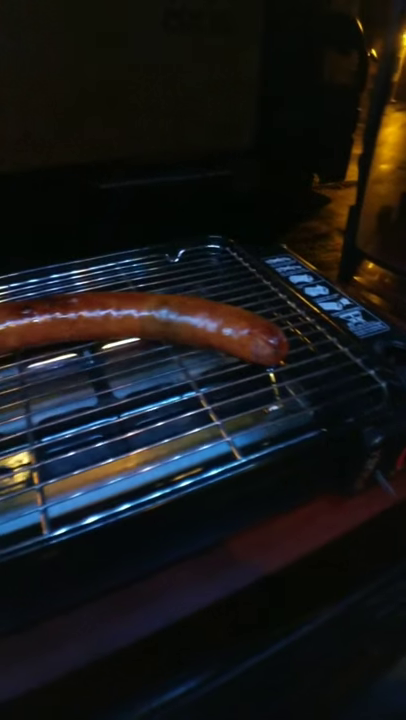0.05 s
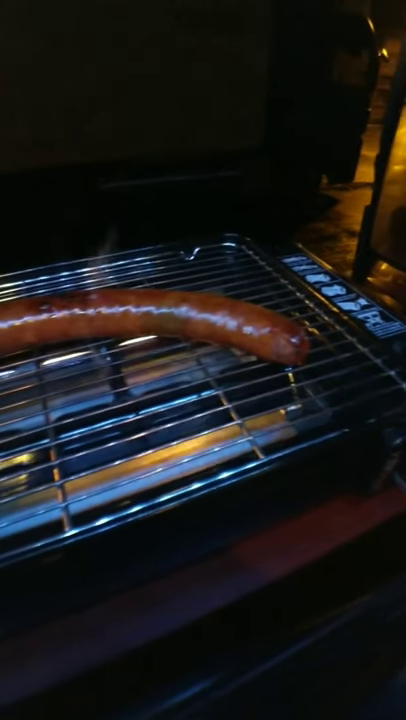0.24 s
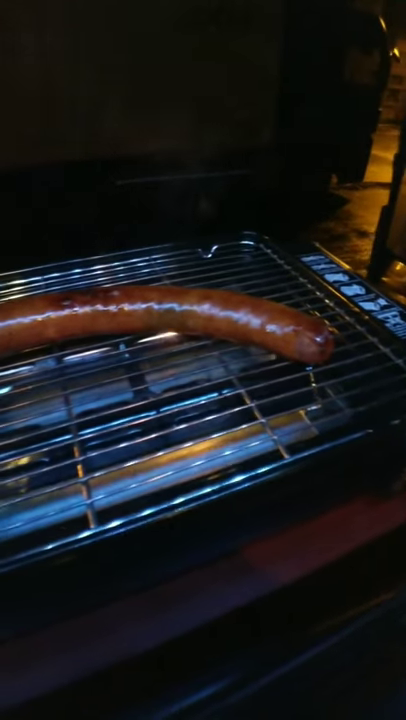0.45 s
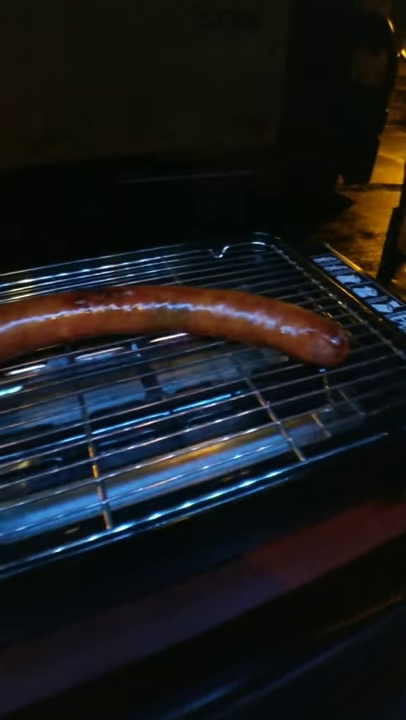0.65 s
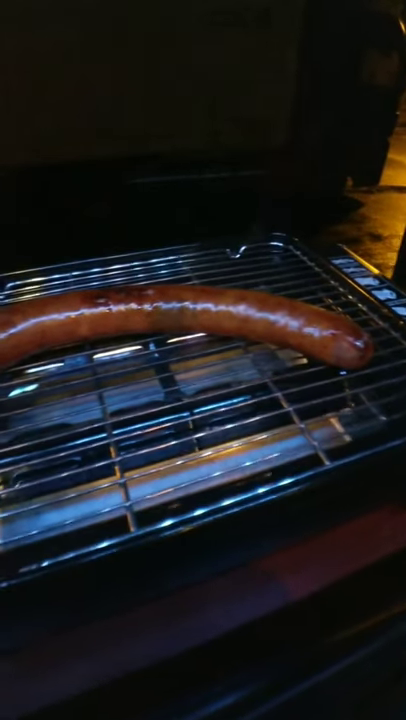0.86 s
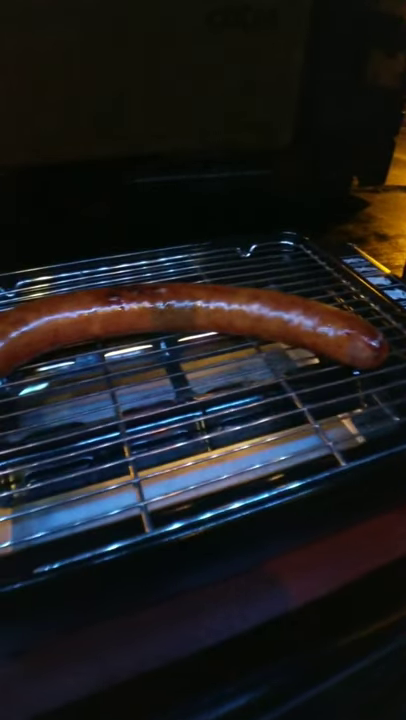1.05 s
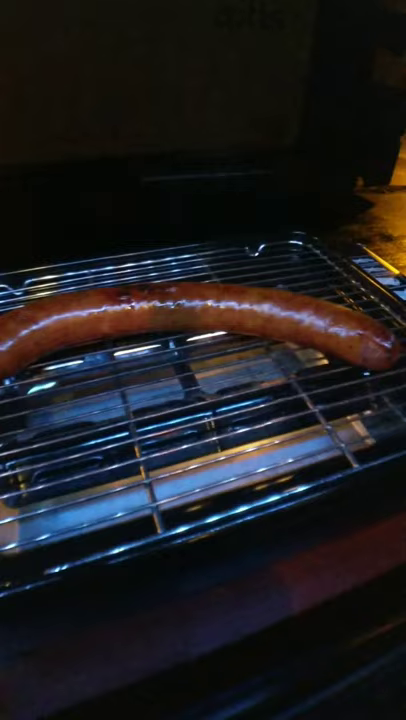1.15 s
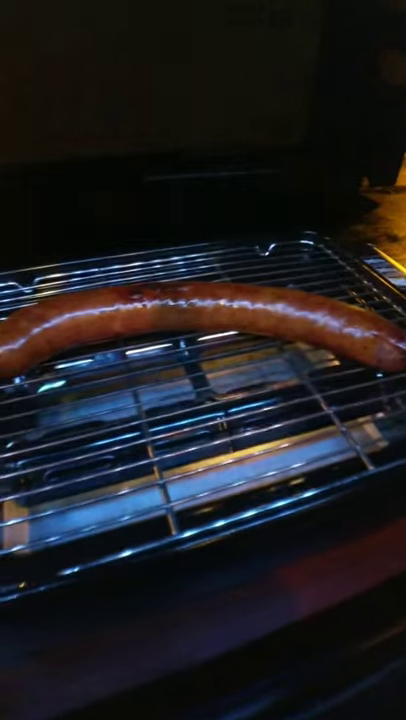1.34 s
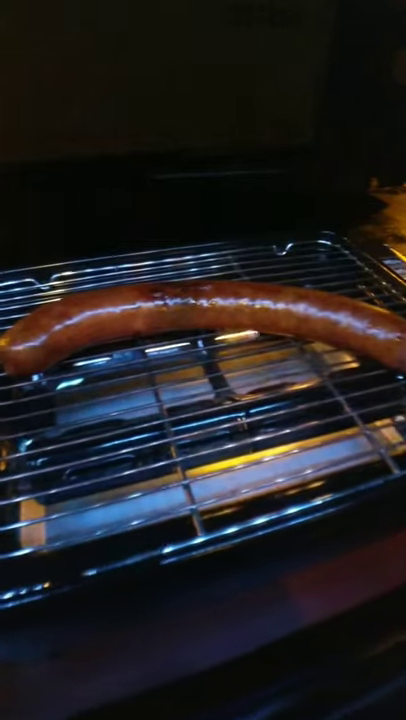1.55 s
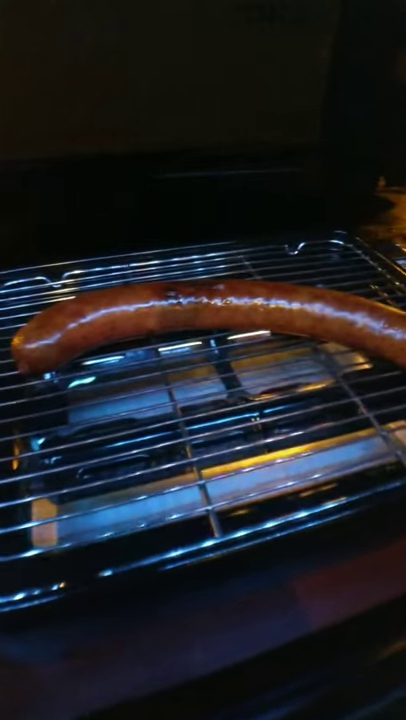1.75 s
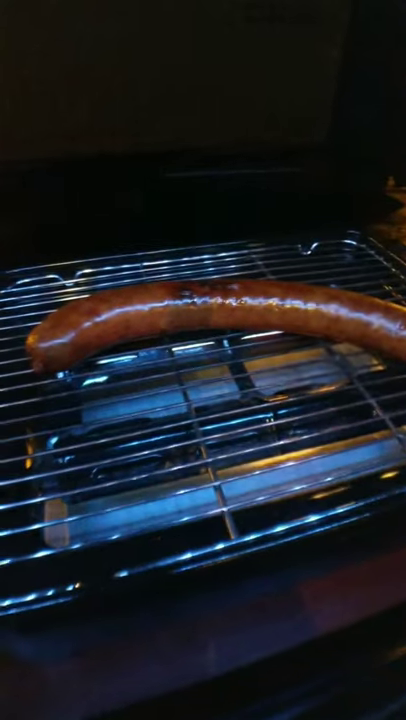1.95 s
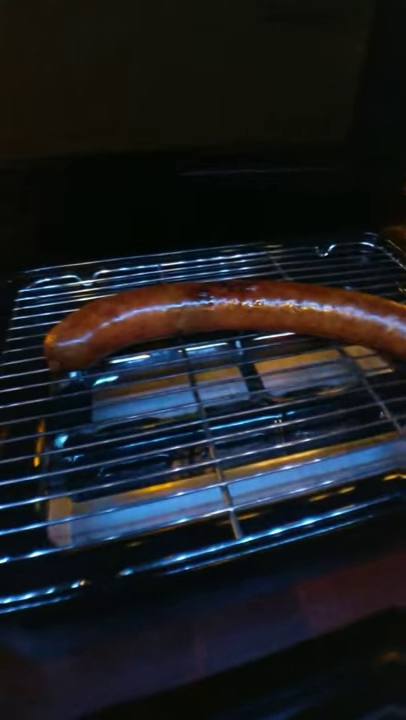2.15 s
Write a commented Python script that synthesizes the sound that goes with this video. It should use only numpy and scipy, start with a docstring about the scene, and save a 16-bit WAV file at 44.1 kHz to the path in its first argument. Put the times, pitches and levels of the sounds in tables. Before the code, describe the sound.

Fat spits and crackles on a tabletop grill inside a vehicle cab, near the microphone; a brief low flutter opens it, one ticking thump comes at left, snaps get stronger, then it cuts off.

```python
"""A sausage sizzles on a small steel grill in a vehicle cab: fat bubbles ring, snap and rattle briefly in the tray,
over noise shaped into a thin hiss. Filtered noise makes the low drone of the cab, which is louder for a moment
at the start, while a low flutter and a thin hiss of opposite sign in the two ears come and go. Then the sound is
almost mono. A low swing with a tick thumps in the left ear alone, later a narrow band of hiss grows,
and the sound stops abruptly."""
import sys
import numpy as np
from scipy import signal
from scipy.fft import rfft, irfft, next_fast_len
from scipy.io import wavfile
from scipy.ndimage import map_coordinates

SR = 44100
rng = np.random.default_rng(int(sys.argv[2]) if len(sys.argv) > 2 else 0)


def unload_wav(signal):
    """Save mono or channel-first audio to the path in sys.argv[1] as 16-bit WAV at rate SR, clipped to [-1, 1]."""
    wavfile.write(
        sys.argv[1],
        SR,
        np.round(np.clip(np.atleast_2d(signal).T, -1, 1) * 32767).astype(np.int16),
    )


def volts_from_db(level):
    """Convert decibel levels to linear amplitude ratios."""
    exponent = np.asarray(level, float) / 20
    return 10 ** exponent


N = 97196


def unit(x):
    """Scales a sound to rms 1."""
    return x / np.sqrt(np.mean(x ** 2) + 1e-20)


def curves(rows):
    """Draws straight lines between the rows: one value per sample for each column after the time."""
    seconds, *columns = np.transpose(rows)
    return [np.interp(np.arange(N) / SR, seconds, column) for column in columns]


def colour(points):
    """Gives the gain over frequency from (Hz, dB) points on a log axis."""
    f, db = np.transpose(points)
    return lambda hz: volts_from_db(np.interp(np.log(hz + 1), np.log(f + 1), db))


def resonance(centre_hz, width_hz):
    """Gives the gain of a narrow peak; the width is taken where the gain has halved."""
    return lambda hz: 1 / (1 + (2 * (hz - centre_hz) / width_hz) ** 2)


def filtered(x, response):
    """Multiplies the spectrum of x by a response of frequency."""
    m = next_fast_len(x.shape[-1] + 2048)
    spectrum = rfft(x, m) * response(np.fft.rfftfreq(m, 1 / SR))
    return irfft(spectrum, m)[..., :x.shape[-1]]


def wobble(rate):
    """Draws a smooth random curve through `rate` random knots a second."""
    knots = rng.standard_normal(int(N * rate / SR) + 4)
    return map_coordinates(knots, [np.arange(N) * rate / SR])


def noise(response):
    """Makes coloured noise of rms 1."""
    return unit(filtered(rng.standard_normal(N), response))


# The colour of the snaps. Each row: frequency in Hz, gain in dB.
SNAP_COLOUR = [(1200, -45), (2000, -15), (3500, -8), (4300, -8), (5200, -2), (6200, -4), (7200, -1),
               (8100, -5), (8800, 3), (11000, -2), (12500, -3), (14000, -9), (16500, -13)]
# A small bubble radiates no bass. Each row: frequency in Hz, gain in dB.
BUBBLE_BASS_LOSS = [(900, -24), (2400, 0)]


def bursts(s, db, hz, ms, snap_db):
    """Each bubble rings a few cycles with a snap, and the tray scatters it anew."""
    ring_cycles = 2.2  # the ring falls to 1/e in this many cycles
    rattle_db, rattle_fall_db = -16.5, 9  # start of the tray's answer, and its fall over the rattle length
    tail_db, tail_t60_s = -26.5, 0.052  # after-ring of the tray
    echo_ms, echo_gain = .567, .7  # every burst bounces once off the tray floor
    # under this peak a burst loses its first spike: dB per dB, down to a limit
    sharp_db, sharp_slope, softest_db = -24.5, 0.51, -4.5

    t = np.arange(768) / SR
    scatter = rng.standard_normal((len(s), len(t)))
    ring = np.sin(2 * np.pi * hz[:, None] * t) * np.exp(-t * hz[:, None] / ring_cycles)
    ring /= np.linalg.norm(ring, axis=1, keepdims=True)
    # the click is filtered away from the edge, then moved close to the start
    click = (np.arange(len(t)) == 24) * 1.
    snap = np.roll(filtered(click, colour(SNAP_COLOUR)), -20)
    bubble = ring + volts_from_db(snap_db)[:, None] * snap / np.linalg.norm(snap)

    rattle = volts_from_db(rattle_db - rattle_fall_db * (1000 * t / ms[:, None]) ** 2)
    tail = volts_from_db(tail_db - 60 * t / tail_t60_s)
    tray = scatter * (rattle + tail)
    spike = volts_from_db(np.clip(sharp_slope * (db - sharp_db), softest_db, 0))
    tray[:, 0] = spike
    tray[:, round(echo_ms * SR / 1000)] = echo_gain * spike

    pop = signal.fftconvolve(bubble, tray, axes=1)[:, :len(t)]
    pop *= (volts_from_db(db) / np.abs(pop).max(axis=1))[:, None]
    at = np.round(s * SR).astype(int)[:, None] + np.arange(len(t))
    placed = np.bincount(at.ravel(), pop.ravel(), N + len(t))[:N]
    return filtered(placed, colour(BUBBLE_BASS_LOSS))


# The loud bubbles of fat. Each row: start in seconds, peak in dB before the bass loss, pitch in Hz,
# rattle length in ms, broad snap over the ring in dB.
LOUD_BUBBLES = [(0.083, -33.5, 11700.0, 0.71, -1), (0.091, -44, 11500.0, 0.4, -6),
                (0.0942, -37, 8630, 2.9, 5), (0.0973, -39, 12400, 2.2, 3), (0.1124, -23, 12300, 1.4, 6),
                (0.1143, -30, 10200, 1.7, -1), (0.122, -38.5, 6500, 1.5, -7), (0.126, -33, 10100, 1.8, 1),
                (0.1328, -40, 11500, 1.2, -6), (0.138, -41, 10000, 1.6, -12), (0.16, -34, 6000, 2, 1),
                (0.162, -39, 12100, 1.2, 9), (0.167, -36, 10800, 3.3, 6), (0.181, -38, 11000, 1.2, -8),
                (0.1861, -35.5, 13700.0, 1.8, 16), (0.1922, -30.5, 9850, 2.5, 3),
                (0.2427, -48, 10000, 1.4, -10), (0.2587, -41, 10000, 0.75, -5),
                (0.2682, -39.5, 4730, 3.9, 0), (0.279, -32, 9600, 0.87, 13), (0.2897, -37, 11500.0, 1.0, 9),
                (0.2956, -30.5, 9400, 2.2, 6), (0.305, -36, 11000.0, 1.0, 2), (0.3076, -32, 9200, 1.4, 13),
                (0.3207, -39, 7100, 1.3, 1), (0.3346, -44, 10500.0, 1.5, 1), (0.3392, -42, 4900, 1.3, -4),
                (0.3477, -32.5, 11000, 0.75, -4), (0.3595, -33, 4800, 1.3, 1),
                (0.3647, -35, 10700, 1.2, -4), (0.4073, -53, 8900.0, 1.2, 5), (0.413, -25.5, 8800, 0.83, 4),
                (0.4205, -30.5, 10900, 0.51, -9), (0.4355, -36, 10400, 0.94, -10),
                (0.445, -35, 8900.0, 0.94, 9), (0.4527, -38.5, 9500, 1.5, -8), (0.459, -40, 12500, 1.1, -3),
                (0.486, -39, 9000, 1.5, 7), (0.494, -37, 8800, 4.6, -27), (0.518, -31, 8600, 0.81, 0),
                (0.5226, -29, 5000, 1.6, 0), (0.5364, -35, 8800.0, 2.2, 1), (0.5438, -26, 4820, 2.2, 5.5),
                (0.573, -41, 8600, 0.87, -6), (0.5802, -38, 10640, 1.6, -9), (0.597, -38, 10440, 1.3, -2),
                (0.601, -33, 12800.0, 1.1, -6), (0.605, -45, 9600, 1.5, -5), (0.611, -40, 4760, 1.3, -3),
                (0.6173, -36.5, 5170, 1.3, -5), (0.619, -32.5, 11000, 1.1, -9), (0.63, -37, 4960, 1, -2),
                (0.6387, -36.0, 5200, 1.2, -3), (0.6483, -37.5, 5100, 1.1, -10),
                (0.6676, -31.5, 11460, 1.1, -6), (0.673, -39, 10200, 1.7, -10), (0.683, -39, 5030, 1.1, -7),
                (0.6924, -39.5, 5000, 1, -10), (0.695, -40, 10500, 1.2, -2), (0.703, -51, 13000, 1.2, -3),
                (0.714, -37, 7500, 2.7, 1), (0.743, -35, 11200, 1.6, -6), (0.7532, -31.5, 4900, 1.2, 6),
                (0.7848, -33.5, 4920, 1.1, -1.5), (0.791, -38.5, 5160, 2.6, 3.5),
                (0.8107, -38.5, 10000.0, 1.2, 1), (0.8211, -27.5, 5130, 1.8, 2),
                (0.8347, -28, 5130, 1.8, -2), (0.8388, -27, 9700, 0.95, 0.5),
                (0.847, -34.5, 5060, 0.68, -13), (0.86, -36, 12000, 0.8, 10), (0.8666, -28, 10900, 1.2, 8),
                (0.8814, -28.5, 10830, 2.1, -1.5), (0.9044, -32.5, 11000, 1.2, 14),
                (0.9452, -34.5, 4970, 1.1, -2), (0.9501, -32.5, 9540, 4.1, 3), (0.97, -38, 5200, 0.92, 6),
                (0.9923, -43, 7250, 1, -10), (0.9986, -34.5, 5300, 0.65, 2), (1.0032, -38, 4800, 1.5, -2),
                (1.0115, -35, 7900, 1.2, -6), (1.0275, -40, 12500, 1.1, 6), (1.043, -42, 13000, 1, -5),
                (1.05, -39.5, 7000.0, 0.86, -3), (1.053, -34.5, 12500, 1.2, 0),
                (1.0884, -32.5, 7400, 1.5, 2), (1.094, -30.5, 8900, .8, 3), (1.095, -28.5, 5330, 4.2, 6),
                (1.1262, -34, 10200, 1.8, 1), (1.1579, -24, 8800, 1.8, 9), (1.1657, -31.5, 8870, 1.4, 5.5),
                (1.1675, -25, 12000, 1.5, 5), (1.1693, -22, 10160, 3.5, 6),
                (1.1854, -30, 12600.0, 1.1, -7.5), (1.1918, -37, 8800, 1.5, -21),
                (1.215, -24.5, 11900, 1.8, 23), (1.2254, -38.5, 6960, 1.5, -3),
                (1.2352, -35, 15100, 1.1, -11), (1.2594, -28.5, 6900, 1.6, 3), (1.26, -29, 14800, 1.2, -3),
                (1.2627, -34.5, 6500, 1.3, -11), (1.267, -41, 7300, 2.9, -10.5),
                (1.2851, -33.5, 7200, 1.4, -1), (1.3213, -36.5, 5200, 1.8, 1.5), (1.3537, -35, 7440, 1, 0),
                (1.3713, -33, 8170, 1.7, -26.5), (1.388, -29.5, 7170, 1.1, 1),
                (1.4306, -29.5, 9000, 0.85, 1.5), (1.452, -43.5, 8700, 1.5, -2),
                (1.463, -32.5, 13360, 2.2, -1), (1.475, -30.5, 9300, 2.4, -14),
                (1.4935, -41, 12000, 0.94, 7), (1.5017, -37, 7400, 1.9, -8), (1.507, -37, 11000, 1.4, 0),
                (1.51, -41.5, 11000, 1.2, 4.5), (1.5162, -43, 9000, 1.2, -9), (1.5205, -36, 14000, 1.5, 7),
                (1.5295, -39, 8900, 1.7, 3), (1.5355, -31, 14500.0, 1.5, 5),
                (1.5472, -24.5, 9400, 1.6, -15), (1.549, -34, 14000, 1.2, 7), (1.5725, -30.5, 6630, 2.3, 3),
                (1.5891, -36.5, 9100, 1.3, -5.5), (1.5982, -31.5, 9000, 0.75, -12.5),
                (1.6096, -18.5, 9360, 2.9, 6.5), (1.62, -40.5, 8800.0, 3.5, -8),
                (1.642, -35.5, 8780, 1.5, -10.5), (1.6492, -35.5, 8850, 0.45, -9),
                (1.651, -36, 8800, 1.2, -14), (1.6726, -38, 8800.0, 1, -14.5), (1.683, -26, 6240, 2.4, 3),
                (1.722, -46, 9970, 1.5, -9.5), (1.7283, -19, 4960, 0.75, 10), (1.7384, -25.5, 9300, 1.5, 1),
                (1.7598, -30, 8900, 1.4, 15), (1.766, -37.5, 9140, 1.4, -3), (1.783, -28.5, 4840, 1.2, -9),
                (1.788, -40, 13600, 1.6, 1), (1.824, -38, 8900.0, 1.2, 5), (1.8638, -35, 10100, 1, 6),
                (1.865, -35, 5070, 2.9, -0.5), (1.868, -40, 8000, 1.6, 4), (1.9123, -37, 6780, 0.68, -9)]


def loud_bubbles():
    """Plays the large bubbles of fat, each bursting at its own time and pitch."""
    return bursts(*np.transpose(LOUD_BUBBLES))


# The strength of the sizzle. Each row: time in seconds, hiss level in dB before its small wobble.
SIZZLE_LEVEL = [(0, -58), (.05, -66.5), (.1, -65.5), (.3, -62.5), (.6, -60.5), (.9, -63.5), (1.2, -61.5),
                (1.45, -64.5), (1.65, -61), (1.8, -61), (1.93, -62.5)]


def small_bubbles():
    """Scatters a crowd of small bursts at random, louder when the sizzle is stronger."""
    per_s, quietest_db, spread_db = 280, -49.5, 3.5  # quietest at the mean sizzle level
    high_hz, sag_hz_per_s = 10500, 950  # the high pitch sinks as the sizzle goes on
    low_hz, low_share = 5150, .2  # some small ones gather round a lower pitch
    scatter_oct, rattle_ms, snap_db = .1, .9, 4

    sizzle_db, = curves(SIZZLE_LEVEL)
    u = rng.random((int(per_s * N / SR), 5))
    at = u[:, 0] * (N - 1) / SR
    strength_db = (sizzle_db - sizzle_db.mean())[(at * SR).astype(int)]
    peak_db = quietest_db - spread_db * np.log(1 - .95 * u[:, 1]) + strength_db
    centre_hz = np.where(u[:, 4] < low_share, low_hz, high_hz - sag_hz_per_s * at)
    # sqrt(6) gives the difference of two uniform draws a standard deviation of 1
    pitch_hz = centre_hz * 2 ** (scatter_oct * np.sqrt(6) * (u[:, 2] - u[:, 3]))
    return bursts(at, peak_db, pitch_hz, rattle_ms + 0 * at, snap_db + 0 * at)


# The colour of the steam. Each row: frequency in Hz, gain in dB.
STEAM_COLOUR = [(1500, -24.5), (3000, -5.5), (4200, -11), (5200, 1.5), (6300, 3), (8000, -2.5), (8900, 2),
                (9800, -2.5), (11500, 2)]
# A narrow band of hiss that grows late. Each row: time in seconds, level in dB before its wobble.
JET_LEVEL = [(0, -78), (.9, -68), (1.2, -68), (1.5, -65.5), (1.72, -67), (1.85, -73.5)]


def steam():
    """Shapes noise into the hiss of steam, a thin top and a narrow jet."""
    air_db = -65  # at the mean sizzle level
    jet_hz, jet_width_hz = 9000, 1300

    sizzle_db, = curves(SIZZLE_LEVEL)
    hiss = volts_from_db(sizzle_db + 1.2 * wobble(40)) * noise(colour(STEAM_COLOUR + [(15000, -60)]))
    air_colour = colour([(9000, -30), (12000, 0), (17000, -2)])
    air = volts_from_db(air_db + sizzle_db - sizzle_db.mean()) * noise(air_colour)
    jet_db, = curves(JET_LEVEL)
    jet = volts_from_db(jet_db + 1.8 * wobble(80)) * noise(resonance(jet_hz, jet_width_hz))
    return hiss + air + jet


def thump():
    """A tick, a quick shiver and one low swing of falling pitch that break off."""
    start_s, length_s = .54505, .0115
    swing_db, swing_hz, sag_s = -20.5, 160, .009  # starting pitch, which falls to 1/e in sag_s
    tick_db, tick_t60_s = -31, .005
    shiver_db, shiver_hz, shiver_t60_s = -33, 590, .035

    t = np.arange(N) / SR - start_s
    on = (t >= 0) & (t < length_s)
    t = np.clip(t, 0, length_s)
    swing = -volts_from_db(swing_db) * np.cos(2 * np.pi * swing_hz * sag_s * (1 - np.exp(-t / sag_s)))
    tick = volts_from_db(tick_db - 60 * t / tick_t60_s) * noise(colour(SNAP_COLOUR))
    shiver = volts_from_db(shiver_db - 60 * t / shiver_t60_s) * np.cos(2 * np.pi * shiver_hz * t)
    return on * (swing + tick + shiver)


# The left-right difference. Each row: time in seconds, bass level in dB, treble level in dB.
FLUTTER_LEVEL = [(0, -67, -58), (.015, -36, -63), (.042, -45, -67), (.052, -77, -75), (.1, -57, -85),
                 (.15, -77, -110), (.19, -94, -72), (.21, -60, -65), (.27, -71, -79), (.295, -93, -56),
                 (.31, -75, -110), (.34, -110, -120), (.4, -140, -140)]
# The colours of its bass and its treble. Each row: frequency in Hz, gain in dB.
BASS_COLOUR = [(20, -2), (50, -0.5), (90, 4), (160, -10), (300, -30.5), (600, -60)]
TREBLE_COLOUR = [(4000, -54.5), (8000, 6), (15000, 2.5)]


def flutter():
    """Noise in bass and treble, rising and falling fast, to be heard with opposite sign in the two ears."""
    bass_db, treble_db = curves(FLUTTER_LEVEL)
    bass = volts_from_db(bass_db) * noise(colour(BASS_COLOUR))
    treble = volts_from_db(treble_db) * noise(colour(TREBLE_COLOUR))
    return bass + treble


# The swell of the drone. Each row: time in seconds, level in dB (only its change about the mean counts).
DRONE_SWELL = [(0.05, -49.5), (0.076, -50.5), (0.314, -46.5), (0.518, -46), (0.55, -46), (0.596, -46),
               (1.19, -46.5), (1.2, -46), (1.882, -46.5), (1.92, -45.5)]
# The colour of the broad rumble. Each row: frequency in Hz, gain in dB.
RUMBLE_COLOUR = [(20, -35.5), (33, -25.5), (42, -2.5), (71, -7), (106, 4.5), (166, -9.5), (202, -4.5),
                 (272, -9.5), (375, -9), (528, -15.5), (654, -13), (1270, -18.5), (3190, -26.5),
                 (5000, -31), (6500, -47), (11000, -120)]
# Narrow hums in the drone. Each row: pitch in Hz, width in Hz, rms level in dB before the swell.
DRONE_HUMS = [(48, 7.4, -68.5), (103, 6.9, -59.5), (106.4, 18, -56.5), (205.8, 4.6, -58.5),
              (248.7, 25, -63.5), (374.7, 15, -62.5), (412.2, 18, -61.5), (460, 28, -66.5)]


def cab():
    """Broad rumble with a few narrow, wavering hums, all made of filtered noise."""
    open_s, open_db, open_bass_db = .0462, 9, -49.5  # louder at first, and heavier in the bass
    rumble_db = -49.0  # before the swell

    opening = np.arange(N) < open_s * SR
    level_db, = curves(DRONE_SWELL)
    swell = volts_from_db(level_db - level_db.mean() + open_db * opening)
    rumble = volts_from_db(rumble_db) * noise(colour(RUMBLE_COLOUR))
    hums = sum(volts_from_db(db) * noise(resonance(hz, width)) for hz, width, db in DRONE_HUMS)
    heavy = volts_from_db(open_bass_db) * opening * noise(colour(BASS_COLOUR))
    return swell * (rumble + hums) + heavy


def scene():
    """Puts the grill and the cab in the middle, the flutter at the sides and the thump at the left."""
    mid = loud_bubbles() + small_bubbles() + steam() + cab()
    side = flutter()
    return np.array([mid + side + thump(), mid - side])


def low_pass(x):
    """Removes everything above the highest recorded frequency."""
    return signal.sosfilt(signal.butter(12, 16840, fs=SR, output="sos"), x)


def record(dry):
    """Limits the band steeply and ends the sound abruptly."""
    top_hz, end_s = 15860, 1.9326
    limited = filtered(dry, lambda hz: 1 / (1 + (hz / top_hz) ** 500))
    mix = limited * (np.arange(N) < end_s * SR)
    return low_pass(mix)


dry = scene()
out = record(dry)
unload_wav(out)
```